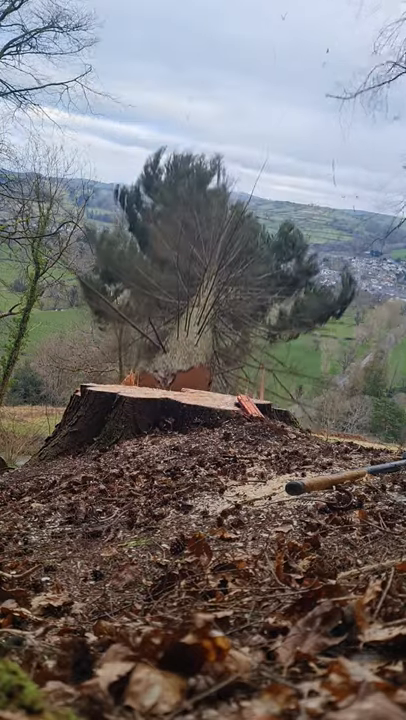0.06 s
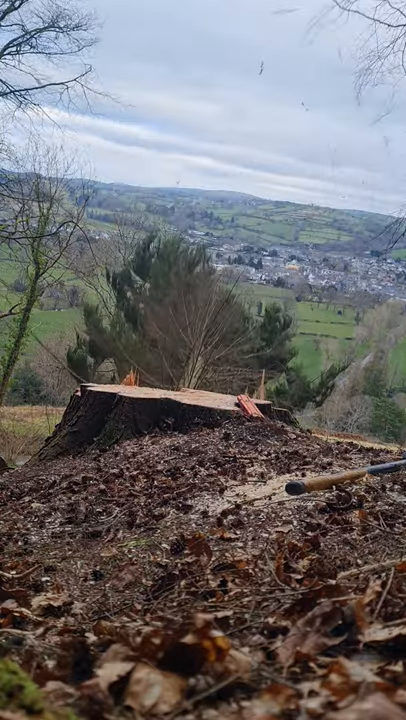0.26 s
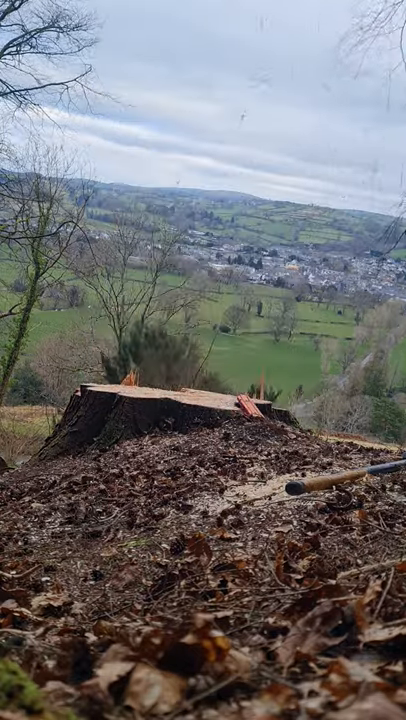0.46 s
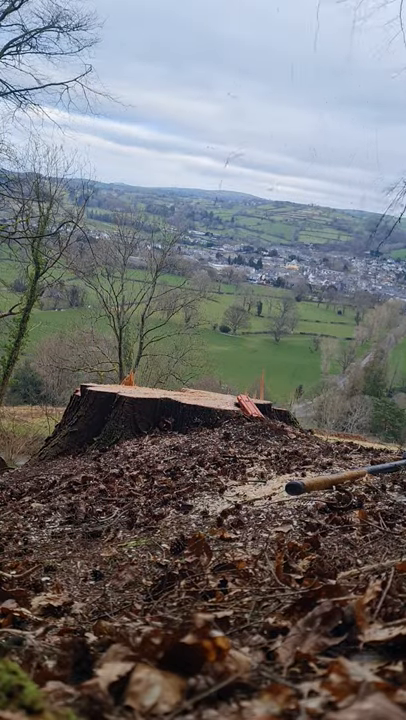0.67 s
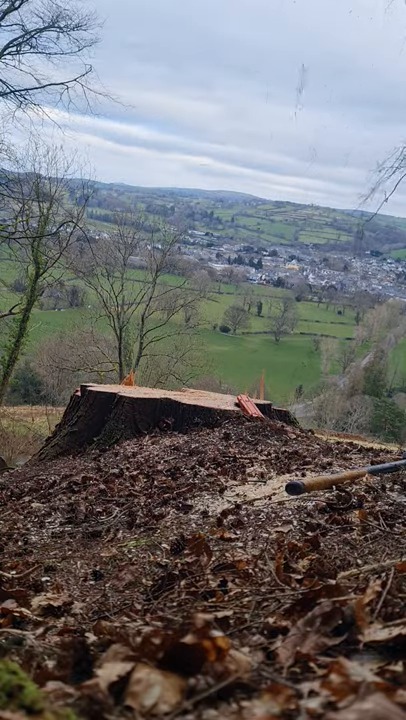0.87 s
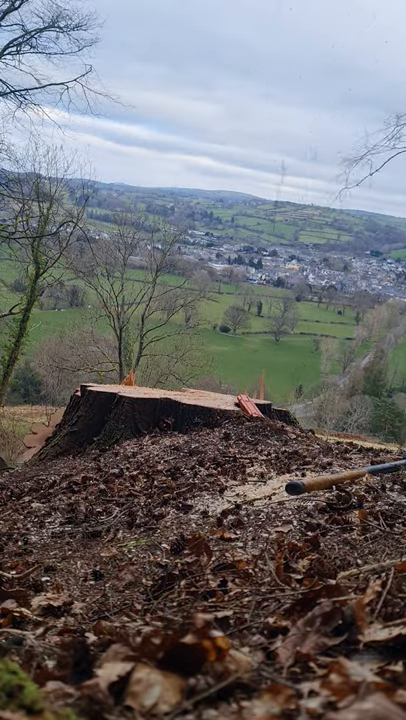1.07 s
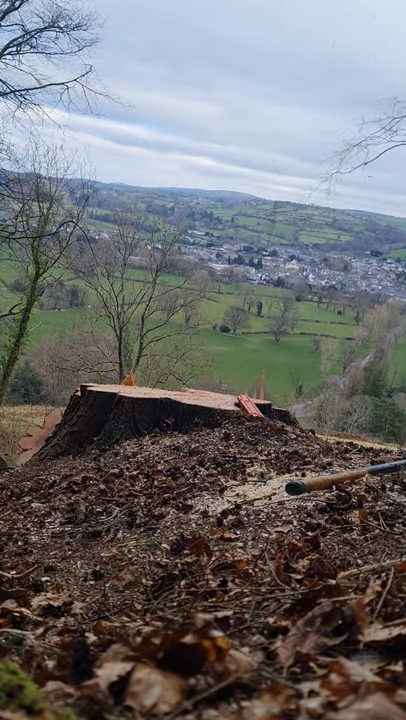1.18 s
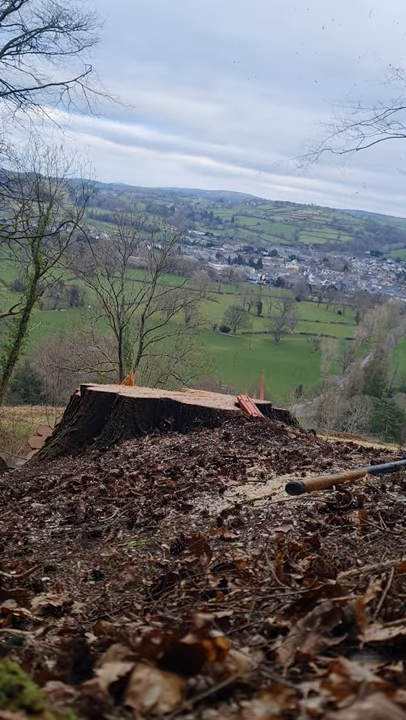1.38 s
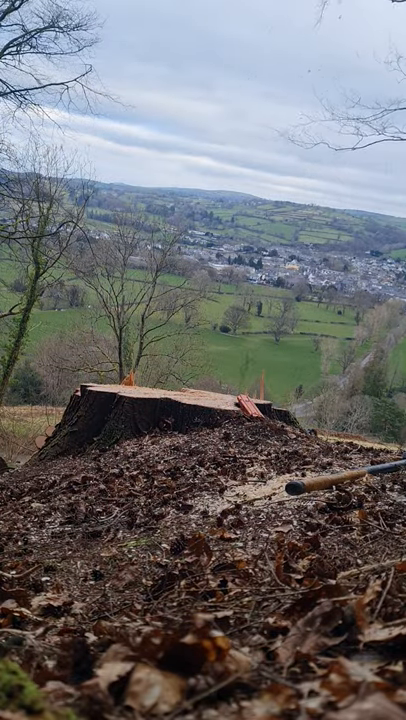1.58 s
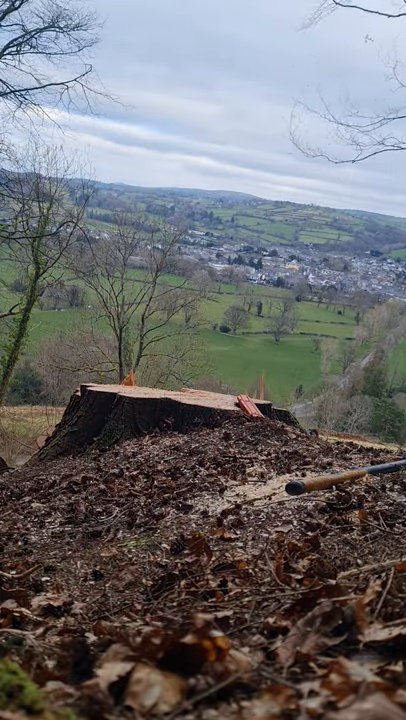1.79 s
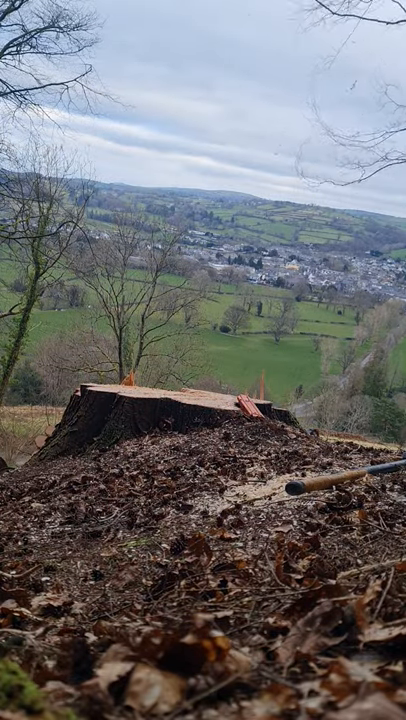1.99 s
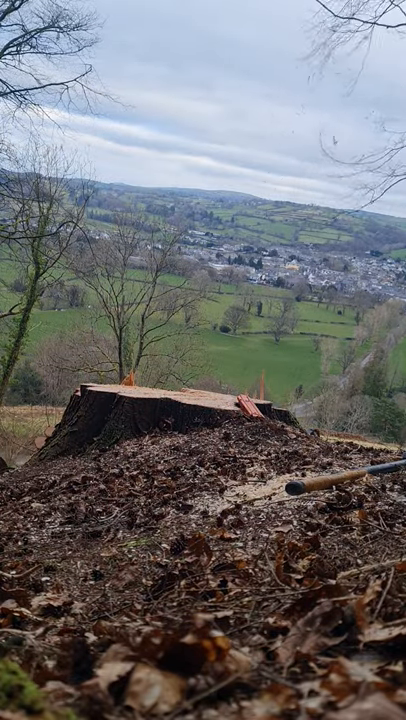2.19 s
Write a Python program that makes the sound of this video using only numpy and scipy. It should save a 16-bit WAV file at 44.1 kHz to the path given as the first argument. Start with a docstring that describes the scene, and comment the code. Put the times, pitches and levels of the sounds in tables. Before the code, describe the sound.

Heard from the leaf litter beside the stump, a felled conifer crashes through hissing, cracking branches and slams into the soil with a deep, rumbling blow. The crackle dies away into scattered small snaps outdoors.

```python
"""A felled conifer crashes onto a wooded slope, its trunk landing with a blow that runs up and down the stem.
Needles swish, twigs crackle, limbs knock and boughs thump into the rumbling soil; a chip drops close by,
a few last sticks snap among the trees and a faint tone lingers in the quiet air.
Heard from a stereo pair in the leaf litter by the stump: the right microphone is dull,
and the limiter ducks at the blow."""
import sys
import numpy as np
from scipy import signal
from scipy.fft import rfft, irfft, next_fast_len
from scipy.io import wavfile
from scipy.ndimage import uniform_filter1d, minimum_filter1d, map_coordinates

SR = 44100
rng = np.random.default_rng(int(sys.argv[2]) if len(sys.argv) > 2 else 0)


def store_wav(level_fs):
    """Save 16-bit WAV to argv[1]."""
    pcm = np.round(np.clip(np.atleast_2d(level_fs), -1, 1) * 32767)
    wavfile.write(sys.argv[1], SR, pcm.T.astype(np.int16))


N = 99225
T = np.arange(N) / SR


def amp(db):
    """Decibels to gain."""
    return 10 ** (np.asarray(db) / 20)


def unit(x):
    """Scaled to rms 1."""
    return x / np.sqrt(np.mean(x ** 2) + 1e-20)


def along(points, hz):
    """Interpolate (Hz, value) points on a log frequency axis."""
    knots_hz, values = np.transpose(points)
    return np.interp(np.log(hz + 1), np.log(knots_hz + 1), values)


def level(rows):
    """Gain per sample from (s, dB) points."""
    return amp(np.interp(T, *np.transpose(rows)))


def wobble(knots_per_s):
    """A smooth random curve."""
    return map_coordinates(rng.standard_normal(2000), [T * knots_per_s], mode="wrap")


def filtered(x, response):
    """x through a response given as a function of Hz."""
    size = next_fast_len(N + 8192)
    return irfft(rfft(x, size) * response(np.fft.rfftfreq(size, 1 / SR)), size)[..., :N]


def coloured(x, colour):
    """x through (Hz, dB) points, at rms 1."""
    return unit(filtered(x, lambda hz: amp(along(colour, hz))))


def add(out, start_s, sound):
    """Mix a short sound into out."""
    start = max(round(start_s * SR), 0)
    out[..., start:start + len(sound)] += sound[:max(N - start, 0)]


def rush(colour):
    """Diffuse noise at the pair: alike on both sides in the bass, much less so in the treble."""
    # Each row: frequency in Hz, left-right correlation.
    likeness = [(60, 0.91), (130, 0.96), (290, 1), (640, 0.97), (1410, 0), (3100, 0.56), (15000, 0.62)]

    def mid_side(hz):
        angle = np.arccos(np.clip(along(likeness, hz), -1, 1)) / 2
        return np.array([np.cos(angle), np.sin(angle)])

    mid, side = filtered(rng.standard_normal((2, N)), mid_side)
    return coloured(np.array([mid + side, mid - side]), colour)


def crackle(per_s, pitch_hz, spread, life_cycles, scatter_db, size=256, mic_lag_s=0.00041):
    """Many small damped cracks, each with its own pitch, strength and direction."""
    draws = rng.uniform(1e-4, 1, (6000, 5))[:int(per_s * N / SR)]
    when, radius, angle, force, bearing = draws.T[:, :, None]
    bell_curve = np.sqrt(-2 * np.log(radius)) * np.cos(2 * np.pi * angle)
    hz = np.clip(pitch_hz * np.exp(spread * bell_curve), 1, SR / 2)
    cycles = hz * np.arange(size) / SR
    polarity = (-1) ** np.arange(len(draws))[:, None]
    strength = amp(scatter_db * np.minimum(-np.log(force), 4))
    cracks = polarity * strength * np.sin(2 * np.pi * cycles) * amp(-60 * cycles / life_cycles)
    lag = (bearing - .5) * mic_lag_s * SR
    channels = []
    for side in (-1, 1):
        samples = np.abs(when * N + side * lag).astype(int) + np.arange(size)
        channels.append(np.bincount(samples.ravel(), cracks.ravel(), N)[:N])
    return unit(np.array(channels))


def snaps(rows, t60_s, width_oct, size=4096):
    """Sharp cracks left of the pair, each a burst of noise with a short splintering tail."""
    out, t = np.zeros((2, N + size)), T[:size]
    splinter = amp(-15 - 60 * t / 0.034)
    fade = amp(-60 * t / t60_s) + splinter
    for start_s, db, hz in rows:
        edges = np.clip(hz * 2 ** (np.array([-1, 1]) * width_oct), 1, SR / 2 - 1000)
        burst = rng.standard_normal((2, size)) * fade
        crack = signal.lfilter(*signal.butter(2, edges, "bandpass", fs=SR), burst)
        start = round(start_s * SR)
        out[:, start:start + size] += amp(db) * crack / np.abs(crack).max(axis=1, keepdims=True)
    return out[:, :N] * amp([[0], [-5.5]])


def bump(hz, rise_cycles, size=6000):
    """A soft swing that swells and dies within a few cycles."""
    cycles = T[:size] * hz
    rise = cycles / rise_cycles
    return -rise ** 2 * np.exp(2 * (1 - rise)) * np.sin(2 * np.pi * cycles)


def air():
    """Quiet outdoor air all round the microphones."""
    # Each row: frequency in Hz, relative level in dB.
    colour = [(15, -30), (35, -16), (65, 11.5), (110, -2.5), (200, -8), (600, -13.5), (2000, -19),
              (4500, -37), (7500, -19), (16000, -27)]
    return amp(-56.5) * rush(colour)


def thin_ring(hz=1244):
    """A faint, slightly unsteady tone lingers as the crash dies."""
    # Each row: time in seconds, level in dB.
    swell = [(1.3, -104), (1.62, -61.5), (1.85, -66.5), (2.05, -62.5), (2.25, -81)]
    waver = 0.68 * np.array([wobble(14), wobble(17)])
    return np.sqrt(2) * level(swell) * np.sin(2 * np.pi * hz * T + waver)


def woodland(x):
    """A thin echo comes back from the surrounding trees."""
    # Each row: frequency in Hz, seconds to fall by 60 dB.
    decay = [(100, 0.17), (1500, 0.81), (10000, 0.44)]
    hz, t, spectrum = signal.stft(rng.standard_normal((2, SR // 2)), SR, nperseg=256)
    fade = amp(-60 * t / along(decay, hz)[:, None])
    _, tail = signal.istft(spectrum * fade, SR, nperseg=256)
    return amp(-3.5) * signal.fftconvolve(x, tail / np.linalg.norm(tail[0]), axes=1)[:, :N]


def chip():
    """A chip drops on dry leaves beside the microphones and bounces."""
    # Each row: start in seconds, relative peak in dB, pitch in Hz.
    bounces = [(1.3161, -9.5, 8000), (1.3194, -19, 11000)]
    return snaps(bounces, t60_s=0.0045, width_oct=1.6)


def needles():
    """The crown sweeps through the undergrowth: a fluttering hiss full of fine ticks."""
    # Each row: time in seconds, relative level in dB.
    swell = [(0, -39.5), (.04, -35), (.15, -40.5), (.2, -34), (.24, -26.5), (.32, -31.5), (.5, -29.5),
             (.6, -30.5), (.72, -28.5), (.87, -38.5), (1.0, -40.5), (1.13, -49), (1.2, -39.5),
             (1.29, -45.5), (1.42, -52), (1.62, -58), (2.25, -61)]
    # Each row: frequency in Hz, relative level of the hiss in dB.
    colour = [(300, 2), (1200, -12), (2500, -5.5), (4000, 0.5), (6000, -2), (9000, -3.5), (16000, -6)]
    hiss = amp(1.1 * wobble(42.4) + 1.2 * wobble(600)) * rush(colour)
    ticks = crackle(per_s=700, pitch_hz=3470, spread=0.2, life_cycles=5.1, scatter_db=2.5, size=128)
    return amp(1) * level(swell) * unit(hiss + amp(-5) * ticks)


def twigs():
    """Twigs break in their hundreds as the crown is crushed: single cracks near, a blur farther off."""
    # Each row: time in seconds, relative level in dB.
    swell = [(0, -42.5), (.17, -44), (.24, -38), (.5, -35.5), (.63, -34.5), (.7, -30.5), (.82, -27.5),
             (.92, -27.5), (1.0, -33), (1.13, -42.5), (1.33, -47.5), (1.38, -44), (1.56, -55),
             (1.87, -62.5), (1.98, -58.5), (2.25, -60)]
    # Each row: frequency in Hz, relative level of the far twigs in dB.
    colour = [(120, -4.5), (350, -1.5), (600, 1), (1000, -0.5), (2000, -1.5), (3200, -3.5), (5000, -9),
              (9000, -17), (16000, -46)]
    cracks = crackle(per_s=1500, pitch_hz=1970, spread=0.54, life_cycles=6.4, scatter_db=2)
    near = unit(filtered(cracks, lambda hz: 1 / np.sqrt(1 + (hz / 4500) ** 4)))  # low-pass
    far = amp(1.17 * wobble(90)) * rush(colour)
    return amp(2) * level(swell) * unit(near + far)


def limbs():
    """Thick limbs jostle in short hollow knocks."""
    # Each row: time in seconds, level in dB.
    swell = [(0, -46), (.05, -40), (.16, -43.5), (.26, -34.5), (.58, -38.5), (.8, -27), (.87, -36),
             (.97, -39.5), (1.17, -51.5), (1.29, -46.5), (1.62, -63), (2.25, -75)]
    # Each row: frequency in Hz, relative level in dB.
    colour = [(60, -8), (150, -6.5), (280, 0), (650, -0.5), (1000, -23), (3000, -35)]
    knocks = crackle(per_s=320, pitch_hz=315, spread=0.42, life_cycles=10, scatter_db=1.5, size=2048)
    return level(swell) * coloured(knocks, colour)


def sticks():
    """Branches and sticks break one by one, off to the left."""
    # Each row: start in seconds, relative peak in dB, pitch in Hz.
    breaks = [(.012, -17, 4540), (.192, -21, 3070), (.228, -8.5, 3000), (0.2542, -12.5, 3800),
              (0.5757, -9, 2010), (.665, -9, 2900), (.680, -10, 2600), (0.7288, -9, 3100),
              (0.896, -12.5, 1560), (1.1435, -20, 2900), (1.1875, -19.5, 2650), (1.2853, -17, 2070),
              (1.371, -21.5, 1330), (1.388, -32, 1780), (1.443, -27.5, 1550), (1.492, -29, 3670),
              (1.9124, -33.5, 1580)]
    return snaps(breaks, t60_s=0.0043, width_oct=0.72)


def ground():
    """The slope shakes under the weight; each bough adds a dull thump and a deep push as the soil gives."""
    # Each row: time in seconds, relative level of the rumble in dB.
    swell = [(0, -48), (.04, -35), (.14, -51), (.25, -27.5), (.37, -28), (.44, -21), (.56, -30.5),
             (.68, -22.5), (.8, -12), (.89, -20), (.97, -28.5), (1.12, -34.5), (1.2, -44), (1.3, -37),
             (1.5, -55.5), (2.25, -52.5)]
    # Each row: frequency in Hz, relative level of the rumble in dB.
    colour = [(15, -42), (28, -21), (45, 2), (70, -2.5), (120, -4), (190, -15), (400, -19.5), (700, -33.5),
              (2000, -85)]
    # Boughs hitting the soil. Each row: start in seconds, relative level in dB, pitch in Hz.
    thumps = [(0.024, -30.5, 440), (0.221, -20.5, 340), (.234, -17, 143), (.327, -16.5, 240),
              (0.343, -21, 267), (.410, -13, 135), (.422, -10, 177), (.797, -12.5, 327),
              (0.841, -15.5, 112.6), (0.883, -12, 69), (1.246, -31, 415), (1.259, -31.5, 333),
              (1.272, -27, 217), (2.185, -42, 257)]
    out = amp(-1.5) * level(swell) * rush(colour)
    push = amp(-6.5) * bump(hz=50, rise_cycles=1)
    for start_s, db, hz in thumps:
        add(out, start_s, amp(db) * (bump(hz, rise_cycles=0.66) + push))
    return out


def trunk(land_s=.7445, trip_hz=77.47, trips=12, size=1024):
    """The landing shock returns weaker and duller from each trip along the trunk; the wood knocks and heaves."""
    shock_hz, shock_width_s, shock_loss_db, dulling = 299, .0013, 5, 0.062
    knock_hz, knock_t60_s, knock_loss_db = 647, 0.02, 2.5
    heave_t60_s = 0.26
    out, t, middle_s = np.zeros(N), T[:size], T[size // 2]
    for trip, detune in enumerate(rng.normal(0, 0.123, trips)):
        arrival_s = land_s + trip / trip_hz
        stretched = (t - middle_s) / (1 + dulling * trip)
        shock = np.exp(-.5 * (stretched / shock_width_s) ** 2) * np.cos(2 * np.pi * shock_hz * stretched)
        add(out, arrival_s - middle_s, -amp(9.5 - shock_loss_db * trip) * shock)
        knock = (1 - np.exp(-t * knock_hz)) * np.sin(2 * np.pi * knock_hz * (1 + detune) * t)
        add(out, arrival_s, amp(-3 - knock_loss_db * trip - 60 * t / knock_t60_s) * knock)
    t = T[:SR // 2]
    heave = (1 - np.exp(-t * trip_hz)) * np.cos(2 * np.pi * trip_hz * t)
    add(out, land_s, -amp(-1.5 - 60 * t / heave_t60_s) * heave)
    return out


def scene():
    """The whole fall as it reaches the stump; only the breaking sticks echo."""
    breaks = sticks()
    close_chip = chip()
    crown = needles() + twigs() + limbs() + breaks + woodland(breaks)
    return crown + ground() + trunk() + close_chip + thin_ring() + air()


def microphones(x, left_lead_s=.00007):
    """An unequal pair in the leaf litter: the right side is duller and hears the sound slightly later."""
    # Each row: frequency in Hz, gain of that microphone in dB.
    left_mic = [(60, -1.3), (700, -1.1), (1300, 1), (2400, 2), (4400, 1.5), (6400, 1), (7700, 3.5),
                (8900, -5), (11500, 0.5), (13800, 3.5), (16000, -6)]
    right_mic = [(60, -0.75), (700, 0.97), (1300, 0.96), (2400, 0), (4400, -6), (6400, -7), (7600, -18),
                 (9300, -18.5), (11500, -14), (13800, -23), (16000, -35)]
    left = filtered(x[0], lambda hz: amp(along(left_mic, hz)))
    right = filtered(x[1], lambda hz: amp(along(right_mic, hz)) * np.exp(-2j * np.pi * hz * left_lead_s))
    return np.array([left, right])


def limiter(x, ceiling_db=0.5, release_db_per_s=137, size=128):
    """Gain drops just ahead of a peak over the ceiling and recovers steadily."""
    peak_db = 20 * np.log10(np.abs(x).max(axis=0) + 1e-9)
    over_db = np.maximum(peak_db - ceiling_db, 0)
    recovery_db = release_db_per_s * T
    cut_db = np.maximum.accumulate(over_db + recovery_db) - recovery_db
    held_gain = minimum_filter1d(amp(-cut_db), 2 * size)
    return x * uniform_filter1d(held_gain, size)


def record(dry):
    """The microphones feed the limiter; the treble ends at 16 kHz."""
    return filtered(limiter(microphones(dry)), lambda hz: hz < 16000)


dry = scene()
out = record(dry)
store_wav(out)
```